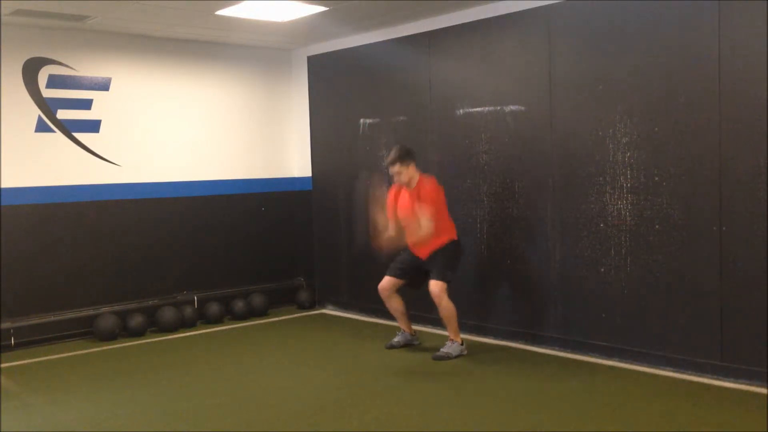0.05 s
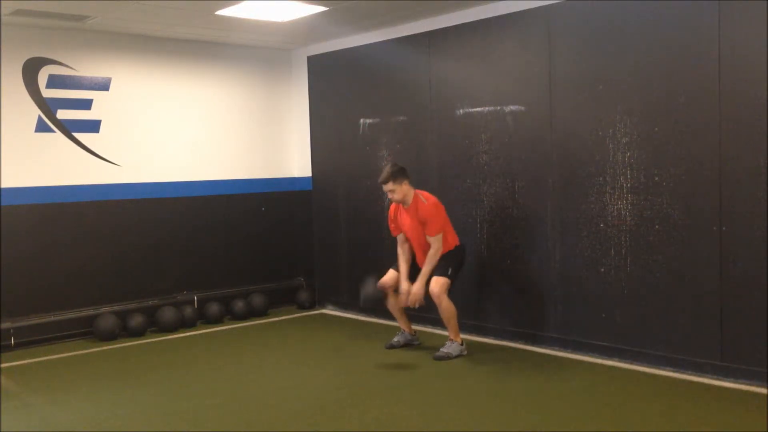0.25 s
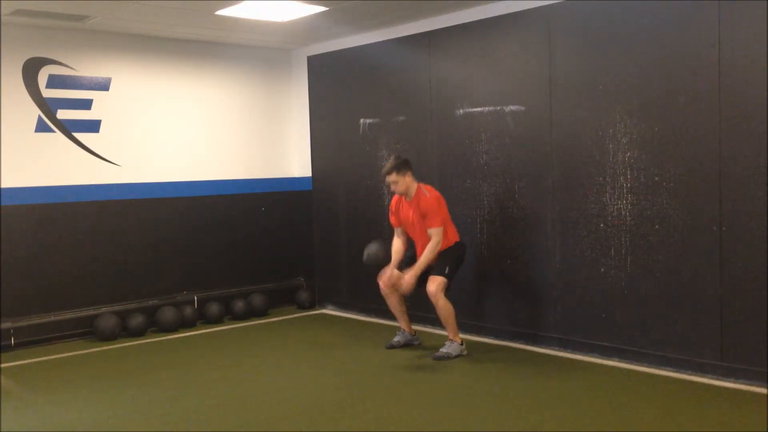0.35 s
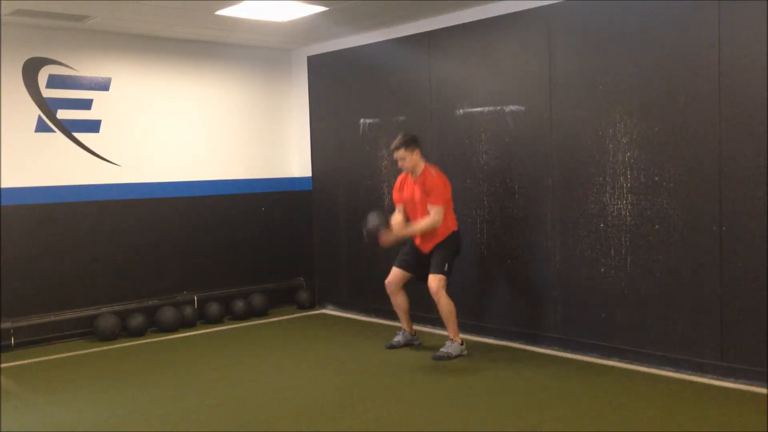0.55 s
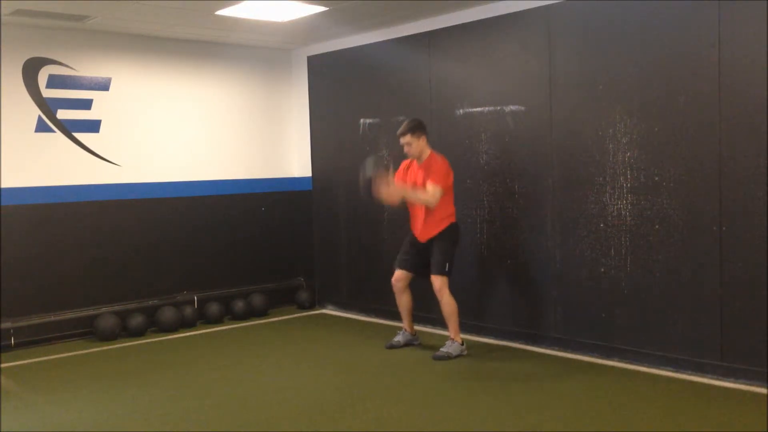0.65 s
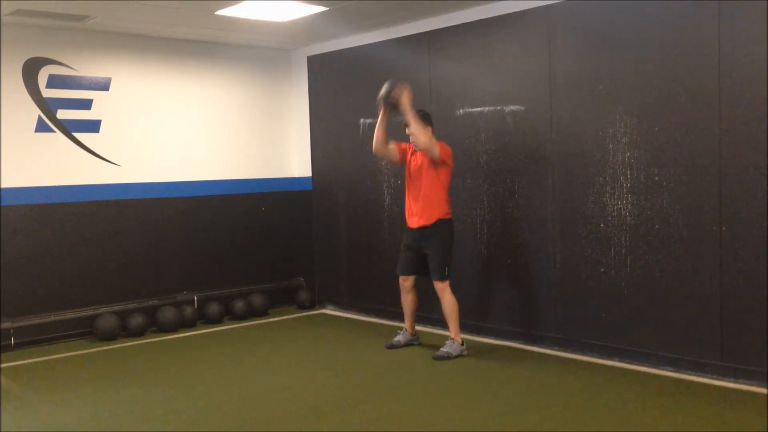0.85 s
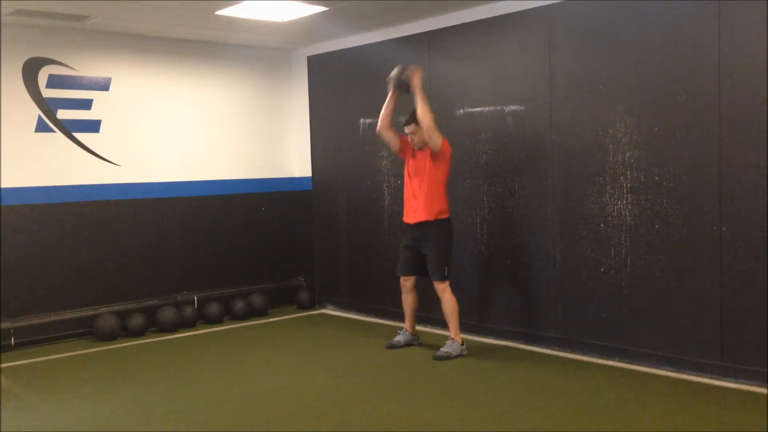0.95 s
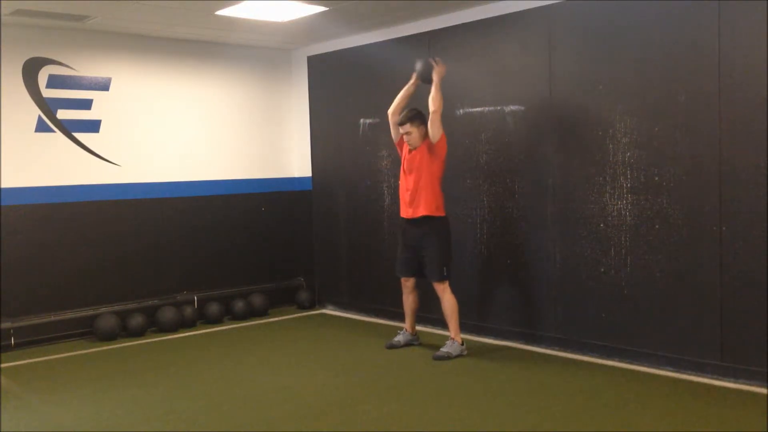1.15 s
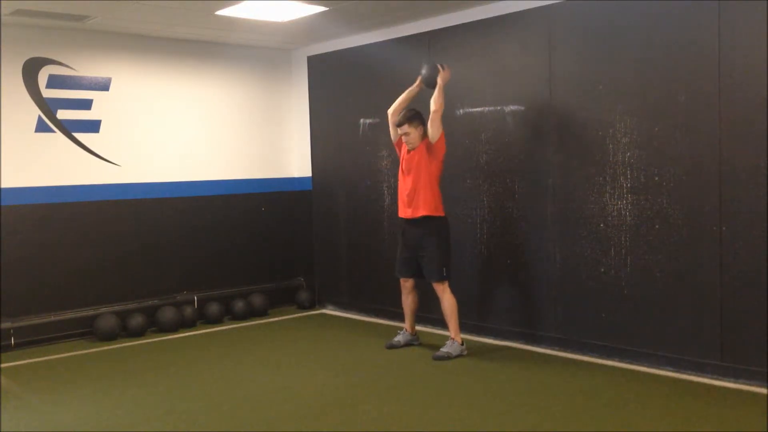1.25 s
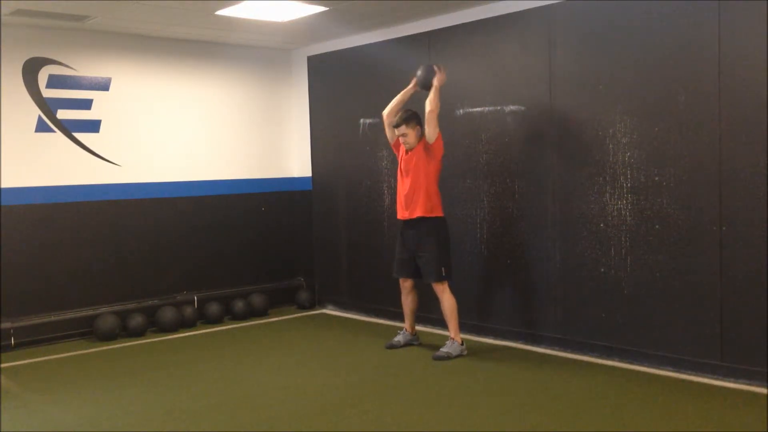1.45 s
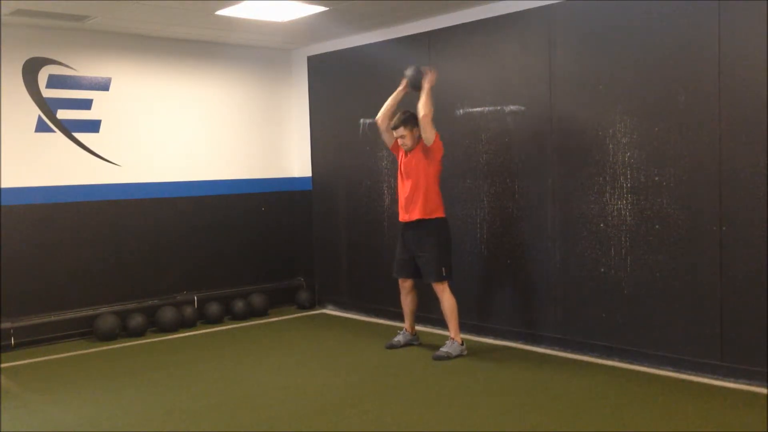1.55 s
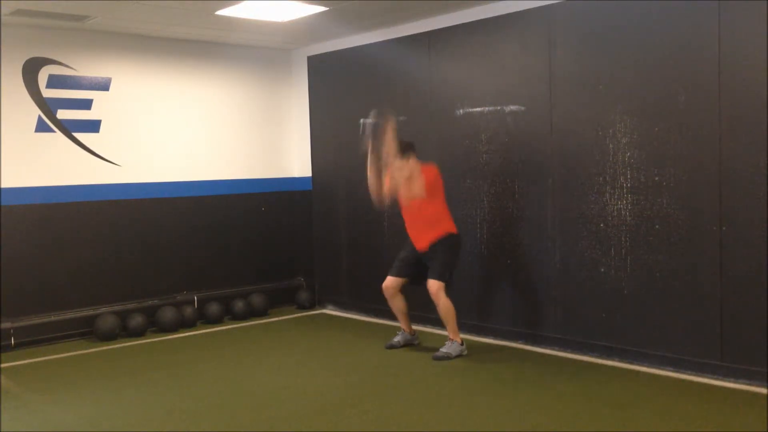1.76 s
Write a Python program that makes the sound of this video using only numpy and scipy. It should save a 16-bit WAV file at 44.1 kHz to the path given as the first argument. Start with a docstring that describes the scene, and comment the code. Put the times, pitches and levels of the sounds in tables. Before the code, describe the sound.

A heavy rubber ball thuds hollowly on gym turf, then hands catch it with a faint slap

```python
"""Clothes rustle faintly over room tone and the hiss of a small microphone, both filtered noise.
Hands brush off a heavy rubber ball: filtered random ticks. It lands on artificial turf with a hollow
thud, a short force ringing ball and floor as decaying sines, and the walls of a bare gym answer in
sparse echoes and a tail. The landing sprays the turf, a hiss of denser-than-hearing ticks that fades.
Palms then rub and slap the ball at the catch: more skin ticks and two much weaker blows."""
import sys
import numpy as np
from scipy import signal
from scipy.fft import rfft, irfft
from scipy.io import wavfile
from scipy.ndimage import uniform_filter1d

SR = 44100
rng = np.random.default_rng(int(sys.argv[2]) if len(sys.argv) > 2 else 0)


def rack_gain(trim_db):
    """Turn a fader trim in dB into the linear factor to multiply a signal by."""
    fader = np.asarray(trim_db, float)
    return 10 ** (fader / 20)


def generate_wav(signal):
    """Clip the signal to [-1, 1] and save it as 16-bit WAV at the path in sys.argv[1]."""
    frames = np.transpose(np.atleast_2d(signal))
    scaled = np.clip(frames, -1, 1) * 32767
    pcm = np.round(scaled).astype(np.int16)
    wavfile.write(sys.argv[1], SR, pcm)


N = 79380  # 1.8 s


def evened(x):
    """Scales a signal to an rms of 1."""
    return x / np.sqrt(np.mean(x ** 2) + 1e-20)


def read_curve(points, hz):
    """Reads a curve of (f/Hz, value) points along a logarithmic frequency axis."""
    f, value = np.transpose(points)
    return np.interp(np.log(hz + 1), np.log(f + 1), value)


def add(mix, start_s, sound):
    """Lays a sound into the mix in place, cut off at the mix's end."""
    part = mix[round(start_s * SR):][:len(sound)]
    part += sound[:len(part)]


def coloured(x, spectrum):
    """Filters x by a spectrum and evens its level."""
    gain = rack_gain(read_curve(spectrum, np.fft.rfftfreq(len(x), 1 / SR)))
    return evened(irfft(rfft(x) * gain, len(x)))


def grains(per_s, spread_db):
    """Dense random ticks of uneven size, as from many tiny contacts."""
    size = rack_gain(spread_db * np.minimum(rng.exponential(1, N), 4))
    present = rng.random(N) < per_s / SR
    return size * rng.standard_normal(N) * present


def swell(start_s, rise_s, hold_s, t60_s):
    """Envelope: squared rise, hold, then exponential fall."""
    t = np.arange(N) / SR - start_s
    rise = np.clip(t / rise_s, 0, 1) ** 2
    return rise * rack_gain(-60 * np.maximum(t - rise_s - hold_s, 0) / t60_s)


def ring(modes):
    """Decaying sines of a struck body."""
    t = np.arange(SR) / SR
    return sum(rack_gain(db - 60 * t / t60) * np.sin(2 * np.pi * hz * t) for hz, db, t60 in modes)


# slow fade of the clothes: (t/s, level/dB)
RUSTLE_FADE = [(0.0, -68.5), (1.8, -81.5)]
# tone of the cloth: (f/Hz, level/dB)
CLOTH_TONE = [(150, -22), (300, -5.5), (600, -4), (1000, -6.5), (2000, -11), (5000, -15), (12000, -32)]


def clothes():
    """Cloth rubbing on cloth: filtered noise that fades while its level wavers in random lumps."""
    t, level_db = np.transpose(RUSTLE_FADE)
    lumps = evened(uniform_filter1d(rng.standard_normal(N), 900))  # smoothed over about 20 ms
    env = rack_gain(np.interp(np.arange(N) / SR, t, level_db) + 2.3 * lumps)
    return env * coloured(rng.standard_normal(N), CLOTH_TONE)


# tone of the quiet room and the small microphone: (f/Hz, level/dB)
HISS_TONE = [(18, -46.5), (30, -11), (85, -8.5), (168, -7.5), (230, -5.5), (378, -11.5), (419, -11.5),
             (784, -18), (1250, -19), (1630, -18.5), (2970, -15.5), (15400, -17.5)]


def room_tone_and_hiss():
    """Steady filtered noise of the room's air and the microphone."""
    hiss_db = -64.5
    return rack_gain(hiss_db) * coloured(rng.standard_normal(N), HISS_TONE)


# skin rubbing on the ball's surface: (start t/s, rise t/s, level/dB, t60/s)
RUBS = [(0.123, .035, -51.5, 0.49), (.567, 0.0055, -53, 0.085), (0.577, 0.0062, -46, 0.084),
        (0.594, 0.0049, -54.5, 0.12)]
# tone of skin on rubber: (f/Hz, level/dB)
SKIN_TONE = [(350, -33), (600, -4.5), (820, -21), (2430, -20.5), (3140, -22.5), (4410, -18.5), (5340, -22),
             (12500, -28), (15400, -35.5)]


def hands():
    """Palms slide off the ball at the throw and close on it at the catch: swells of tiny ticks."""
    env = sum(rack_gain(db) * swell(start, rise, 0, t60) for start, rise, db, t60 in RUBS)
    return env * coloured(grains(per_s=12000, spread_db=-4.5), SKIN_TONE)


# how long the bare gym rings in each band: (f/Hz, t60/s)
ROOM_DECAY = [(50, 0.67), (130, 1.0), (250, 0.7), (400, 0.66), (700, 0.35), (1200, .55), (2500, 0.77),
              (6000, .55), (14000, .45)]
# tone of the gym's tail as it starts: (f/Hz, level/dB)
ROOM_COLOUR = [(40, -4.5), (100, -1), (200, 2), (400, 2.5), (800, 4.5), (1500, -2.5), (3000, 1),
               (15000, 0.5)]


def room(x):
    """Reverberant tail: sparse reflections of random sign, each band dying at its own speed."""
    fade_in_s = 0.0049  # the tail is silent this long, then rises over as long again
    taps = np.zeros(2 * SR)
    slots = np.arange(0, 2 * SR - 20, 20)  # one reflection in every 20 samples
    taps[slots + rng.integers(0, 20, len(slots))] = rng.choice([-1., 1.], len(slots))
    hz, t, bands = signal.stft(taps, SR, nperseg=1024)
    decay_db = 60 * t / read_curve(ROOM_DECAY, hz)[:, None]
    bands = bands * rack_gain(read_curve(ROOM_COLOUR, hz)[:, None] - decay_db)
    tail = signal.istft(bands, SR, nperseg=1024)[1][:2 * SR]
    tail = tail * np.clip(np.arange(2 * SR) / SR / fade_in_s - 1, 0, 1) / 20
    return signal.fftconvolve(x, tail)[:N]


# blows on the ball, the landing and then the palms; levels are relative:
# (t/s, strength level/dB, contact t/s, floor thump level/dB, room send level/dB against the blow)
BLOWS = [(0.2038, -1, .0009, -3.5, 4.5), (0.579, -36, .0012, -36, 7), (0.667, -43, 0.00223, -8.5, -4)]
# the ball's shell and air, levels against each other: (f/Hz, level/dB, t60/s)
BALL_MODES = [(386.7, -7, 0.12), (460, 1.5, 0.11), (512, -3.5, 0.15), (572, -2, 0.2), (644, 0.5, 0.13),
              (792, -31.5, .1), (910.6, -6.5, 0.15), (1065, -6, 0.12), (1300, -8, .06), (1540, -2, 0.026),
              (1740, -26.5, .08), (2050, -21.5, .08)]
# the floor under the turf, levels against each other: (f/Hz, level/dB, t60/s)
FLOOR_MODES = [(57, -30, .5), (94.8, -8, 0.14), (144.6, -16.5, 0.4), (218.6, -21.5, 0.15)]


def ball():
    """A sine-squared force pushes the air and rings ball and floor; gives near sound and room send."""
    push_db = 8  # the bare push of air at contact, against the force
    near, send = np.zeros(N), np.zeros(N)
    for start, db, contact_s, thump_db, send_db in BLOWS:
        t = np.arange(400) / SR
        force = np.sin(np.pi * np.clip(t / contact_s, 0, 1)) ** 2
        body = 0.14 * ring(BALL_MODES) + rack_gain(thump_db) * ring(FLOOR_MODES)
        hit = signal.fftconvolve(force / force.sum(), body)
        # the push of air is followed by a weaker pull
        hit[:400] += rack_gain(push_db) * (force - .5 * np.roll(force, round(contact_s * SR)))
        add(near, start, rack_gain(db) * hit / 2)
        add(send, start, rack_gain(db + send_db) * hit / 2)
    return first_echoes(near), send


# first echoes from walls and ceiling: (delay t/s, gain as a factor)
ECHOES = [(.0032, 0.31), (.0052, 0.69), (0.0095, 0.31), (0.0138, 0.4), (.021, .3), (.033, 0.17)]


def first_echoes(x):
    """The direct sound plus single reflections, each a delayed and weaker copy."""
    walls = np.zeros(SR // 10)
    walls[0] = 1
    for delay, gain in ECHOES:
        walls[round(delay * SR)] = gain
    return signal.fftconvolve(x, walls)[:N]


# tone of the turf blades and crumbs: (f/Hz, level/dB)
TURF_TONE = [(1290, -33.5), (2200, -1), (2850, -12.5), (3120, -7), (3790, -2), (5340, -5.5), (5750, -6),
             (6180, -3.5), (13200, -19.5), (15400, -22.5)]


def spray():
    """Crumbs and plastic blades thrown up by the landing hiss on: dense ticks, held and then fading."""
    env = swell(start_s=.2045, rise_s=0.0049, hold_s=0.074, t60_s=0.52)
    level_db = -37.5
    return rack_gain(level_db) * env * coloured(grains(per_s=11000, spread_db=-2.5), TURF_TONE)


def scene():
    """Sums the near sounds and the gym's tail into one channel."""
    rustle, skin = clothes(), hands()
    thud, thud_send = ball()
    turf = spray()
    tail = room(thud_send + rack_gain(-19) * turf + rack_gain(-23.5) * skin)
    return (rustle + skin + thud + turf + tail)[None]


def low_pass(x):
    """Removes everything above the highest recorded frequency."""
    return signal.sosfilt(signal.butter(12, 15530, fs=SR, output="sos"), x)


def record(dry):
    """Adds the room tone and microphone hiss to the scene."""
    mix = dry + room_tone_and_hiss()
    return low_pass(mix)


dry = scene()
out = record(dry)
generate_wav(out)
```